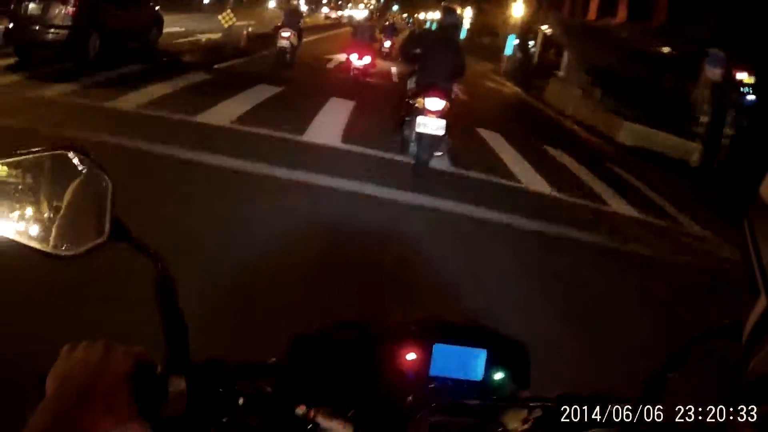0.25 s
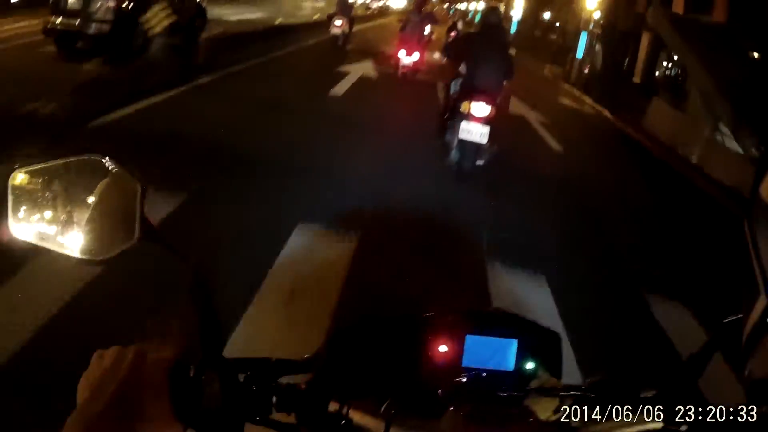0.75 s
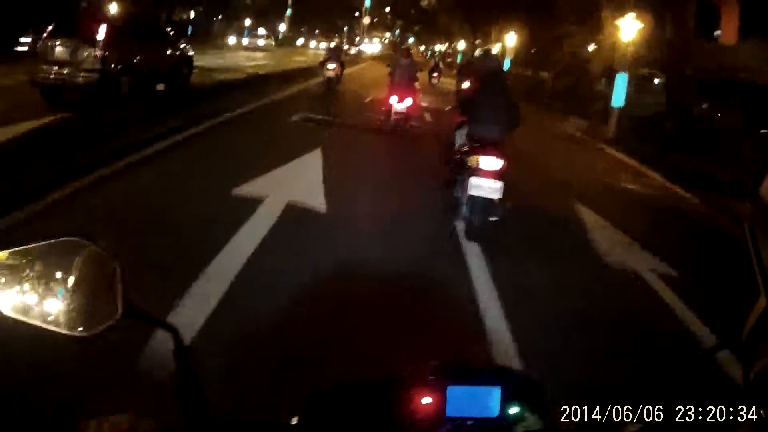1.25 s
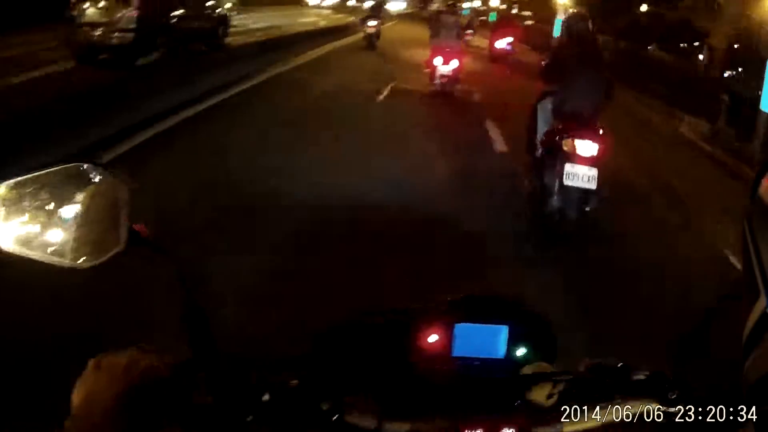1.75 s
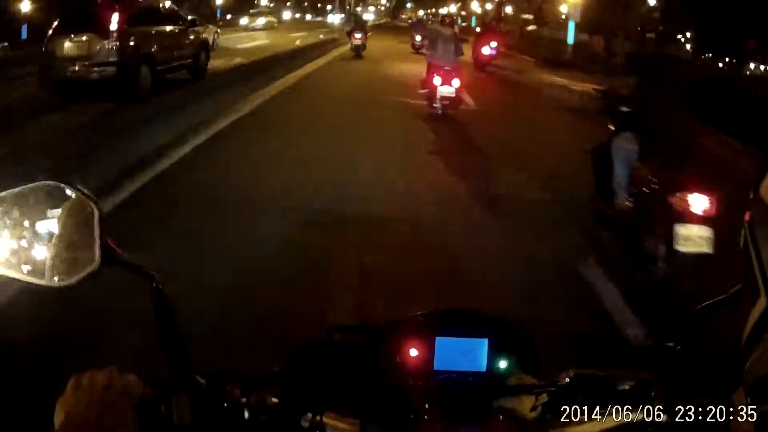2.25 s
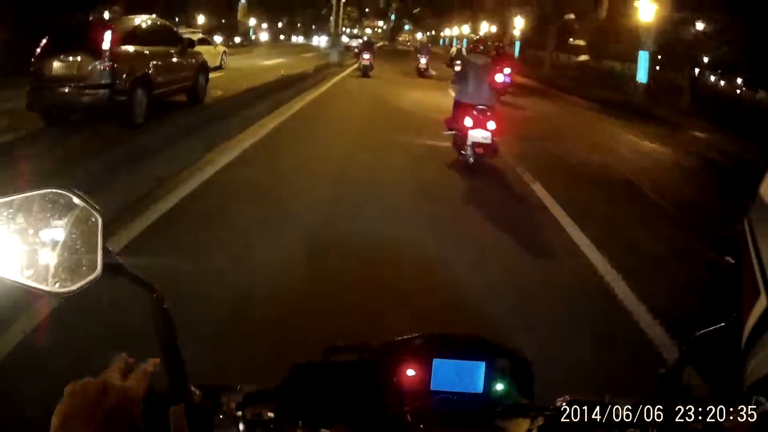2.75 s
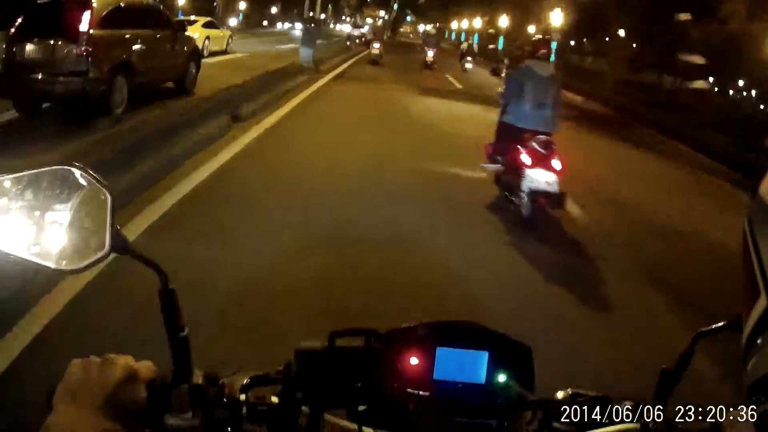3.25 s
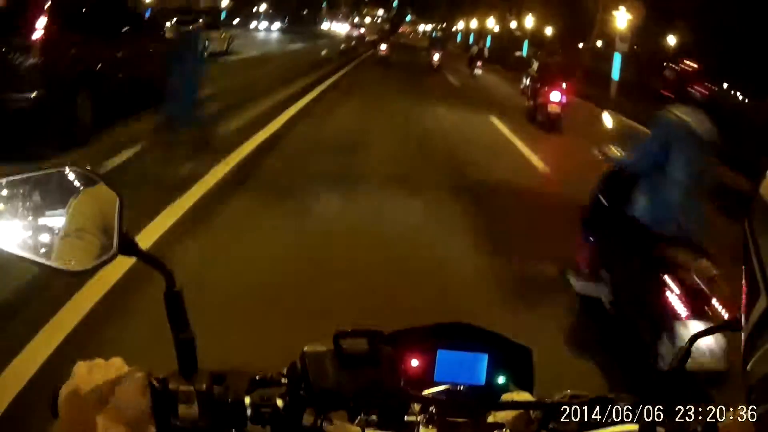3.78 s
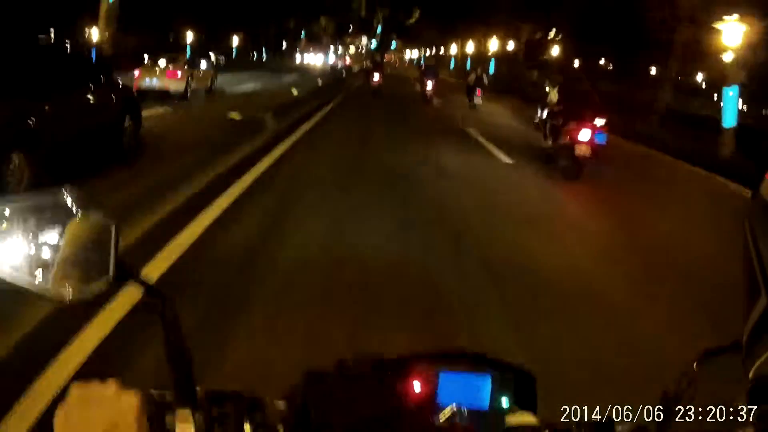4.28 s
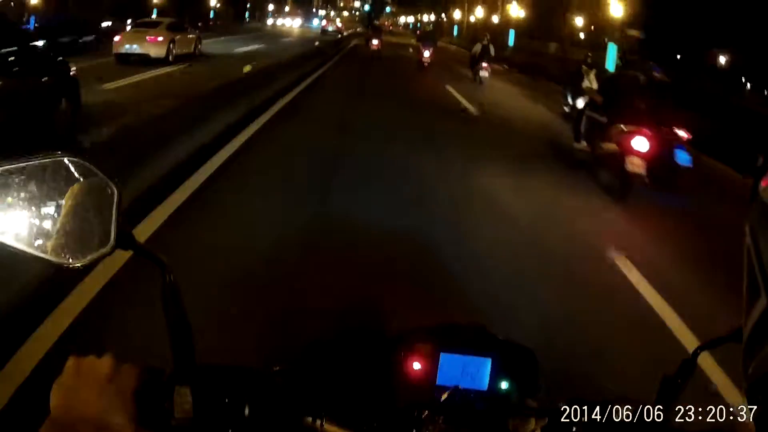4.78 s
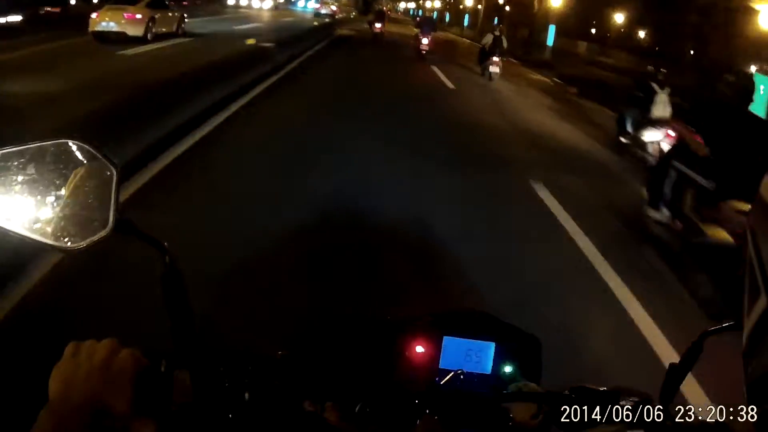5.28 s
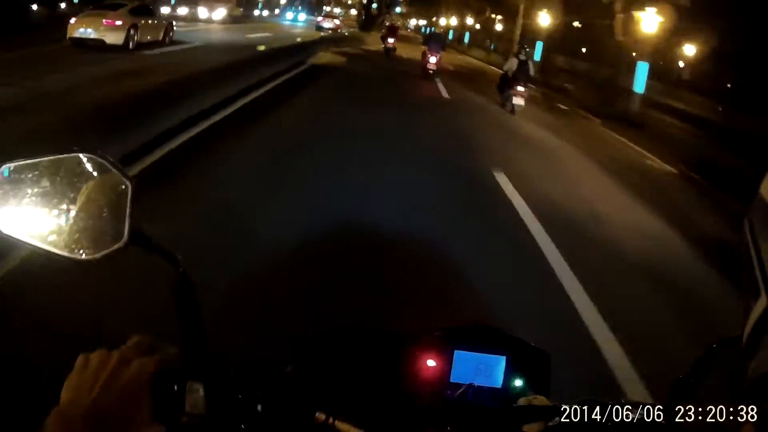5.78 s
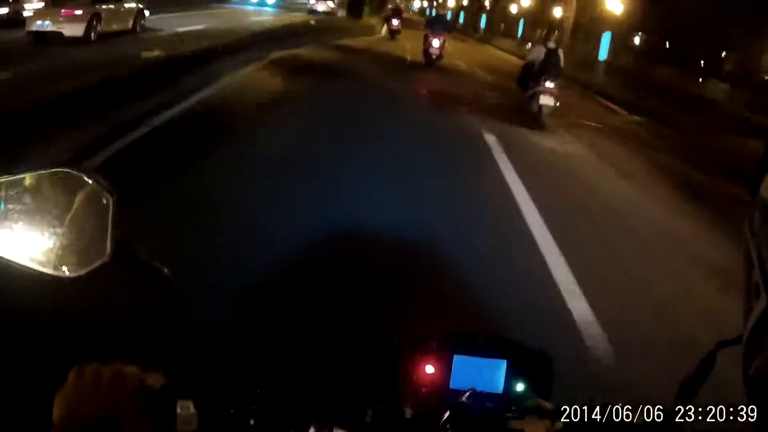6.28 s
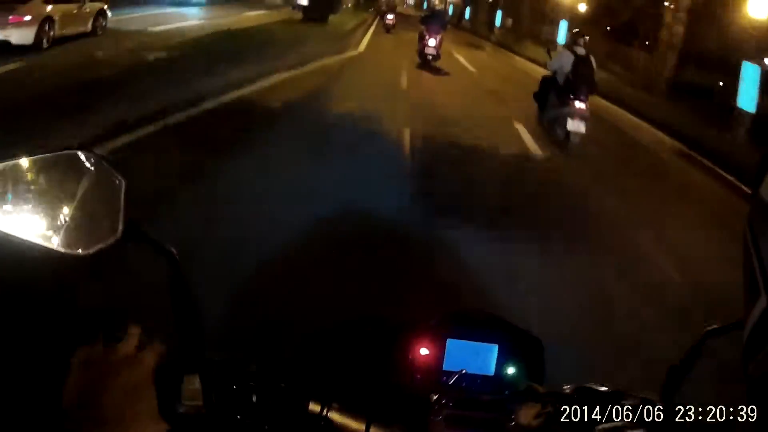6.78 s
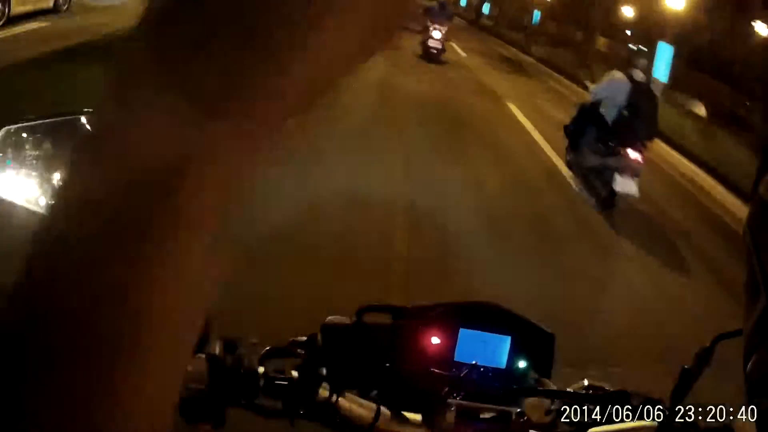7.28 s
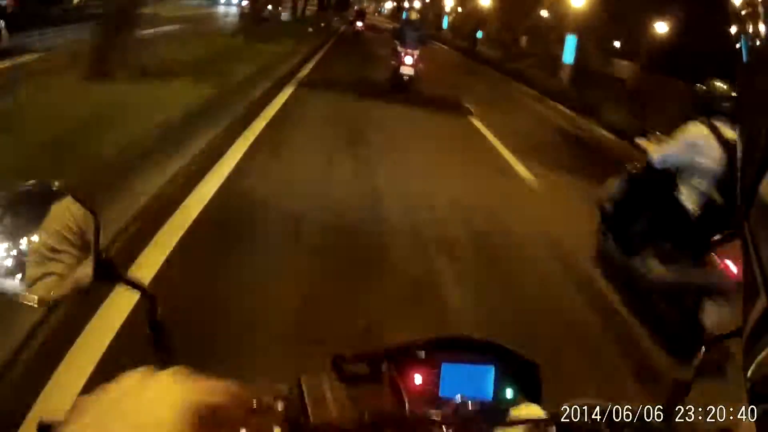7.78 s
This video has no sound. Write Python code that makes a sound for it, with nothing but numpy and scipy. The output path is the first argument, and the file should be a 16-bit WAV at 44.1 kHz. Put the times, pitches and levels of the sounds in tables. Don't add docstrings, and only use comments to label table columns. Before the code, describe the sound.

A microphone on a motorcycle rider catches close single-cylinder exhaust, muffled and throaty, with rapid valve clatter and tyre hiss. Right away the engine eases and its pitch falls for a gear change, ending by 0.35 seconds; from about 0.1 to 0.7 a scooter brake ahead gives a thin, wavering squeal, strongest near 0.2. Bumps knock at 0.5 and 1.25. From 1.4 the engine pulls harder, climbing until a shift at 3.4 drops the note with a jolt. It drives upward again, clatter bright and hard, while gusts batter the microphone into distortion. The heaviest jolt comes at 5.9, beside another gear change; by 6.2 the pitch is lower and the bike coasts, engine softer under roaring wind. Bumps thump near 6.85 and hard at 7.5. Faint, high chain ticking swells around 2.3, 4.3, 5.5 and the end at 8 as scooters are overtaken.

```python
import sys
import numpy as np
from scipy import signal
from scipy.fft import rfft, irfft, next_fast_len
from scipy.io import wavfile
from scipy.ndimage import uniform_filter1d

SR = 44100
rng = np.random.default_rng(int(sys.argv[2]) if len(sys.argv) > 2 else 0)


def to_linear_factor(level_db):
    exponent = np.asarray(level_db, float) / 20
    return 10 ** exponent


def generate_wav(signal):
    frames = np.transpose(np.atleast_2d(signal))
    scaled = np.clip(frames, -1, 1) * 32767
    pcm = np.round(scaled).astype(np.int16)
    wavfile.write(sys.argv[1], SR, pcm)


N = 354563
T = np.arange(N) / SR

# time_s, exhaust_db, crank_hum_db, share of the clatter locked to the cycle [0-1]
THROTTLE = [(0, -18.5, -32.5, 0.85), (.15, -24, -23.5, 0.1), (.25, -25.5, -25, 0.4), (.36, -21.5, -25, 0.3),
            (1.2, -20, -25.5, 0.72), (1.5, -15.5, -16.5, 0.78), (2.1, -15, -21, 0.74),
            (2.5, -14.5, -17, 0.8), (3.35, -14, -21, 0.8), (3.46, -20, -23, 0.3), (3.58, -17, -18, 0.83),
            (4.5, -15, -15.5, 0.82), (5.9, -13.5, -19, 0.76), (6.05, -24, -30.5, 0.27), (7, -22, -18, 0.7),
            (8.04, -25, -30.5, 0.27)]


def evened(x):
    return x / np.sqrt(np.mean(x ** 2) + 1e-20)


def columns(rows):
    s, *values = np.transpose(rows)
    return [np.interp(T, s, v) for v in values]


def locked_share():
    return np.clip(columns(THROTTLE)[2], 0, 1)


def resonate(x, hz, width):
    pole = np.exp((2j * np.pi * hz - np.pi * width) / SR)
    return 2 * signal.lfilter([1 - abs(pole)], [1, -pole], x).real


def ring(x, modes):
    return sum(to_linear_factor(db) * resonate(resonate(x, hz, width), hz, width) for hz, width, db in modes)


def drift(hz):
    span = max(int(SR / hz / 2), 1)
    smooth = uniform_filter1d(rng.standard_normal(N), span)
    return evened(uniform_filter1d(smooth, span))


def coloured(points):
    size = next_fast_len(N)
    hz, db = np.transpose(points)
    log_hz = np.log(np.fft.rfftfreq(size, 1 / SR) + 1)
    shape = np.interp(log_hz, np.log(hz + 1), db, left=-80, right=-120)
    return evened(irfft(rfft(rng.standard_normal(size)) * to_linear_factor(shape), size)[:N])


def exhaust(cycles, hz):
    # centre_hz, width_hz, level_db
    pipe_modes = [(179, 49.4, 1.5), (245.2, 132.6, 5.5), (313.3, 42, -1.5), (399, 30, -8.5), (491, 68, -3)]
    echo_s, echo_gain = 0.003936, 3.03
    pipe_db, hum_db, _ = columns(THROTTLE)
    strength = to_linear_factor(0.68 * rng.standard_normal(600))[cycles.astype(int)]
    pulses = np.diff(np.floor(cycles), prepend=0) * strength / hz
    pulses = pulses + echo_gain * np.roll(pulses, round(echo_s * SR))
    muffler = signal.butter(7, 535., fs=SR, output="sos")
    muffled = signal.sosfilt(muffler, ring(pulses, pipe_modes))
    hum = np.sqrt(2) * np.sin(2 * np.pi * (2 * cycles + .3)) * to_linear_factor(0.26 * drift(1.9))
    return -to_linear_factor(pipe_db) * evened(muffled) + to_linear_factor(hum_db) * hum


def hardness(load_db):
    fade_per_load, hard_load_db = 0.93, -29.5
    return to_linear_factor(np.clip(fade_per_load * (load_db - hard_load_db), -9, 0))


def bump(cycles, at, sharp):
    return np.exp(sharp * (np.cos(2 * np.pi * (cycles - at)) - 1))


def bursts(cycles, hard):
    sizes = to_linear_factor(2.5 * np.clip(rng.standard_normal(1200), -1.6, 1.6))
    uneven = sizes[(2 * cycles + .2).astype(int)]
    strong = hard * bump(cycles, .55, sharp=12.)
    weak = .4 * bump(cycles, .17, sharp=4.)
    return (strong + weak) * uneven


def clatter(knocks, level_db):
    # centre_hz, width_hz, engine_burst_db, tyre_hiss_db
    case_modes = [(1168, 244, 0.5, 2), (1400, 122, -20.5, 7), (1597, 200, 12, 1.5), (1799, 76, -23.5, 2),
                  (2324, 33, -31.5, -18), (3264, 570, -11.5, -13), (3770, 53, -28.5, -15),
                  (5460, 1100, -40.5, -28), (6780, 1300, -30.5, -32), (7790, 850, -40.5, -36.5),
                  (9400, 1300, -49.5, -42)]
    locked = locked_share()
    hz, width, burst_db, hiss_db = np.transpose(case_modes)
    burst = evened(ring(knocks * rng.standard_normal(N), zip(hz, width, burst_db)))
    tyres = rng.standard_normal(N) * to_linear_factor(1.2 * drift(53.0))
    hiss = evened(ring(tyres, zip(hz, width, hiss_db)))
    return to_linear_factor(level_db + 3.5) * (1.07 * locked * burst + np.sqrt(1 - locked ** 2) * hiss)


def valve_slams(cycles, level_db):
    # (centre_hz, width_hz, level_db)
    slams = [
        (.49, 4., [(1640, 430, 0), (3100, 600, -24)]),
        (.93, -5., [(1150, 220, 0), (680, 260, 0), (880, 200, -6)]),
    ]
    out = np.zeros(N)
    for phase, slam_db, modes in slams:
        size = to_linear_factor(0.6 * np.clip(rng.standard_normal(600), -1.6, 1.6))[cycles.astype(int)]
        turns = np.floor(cycles - phase + .004 * drift(40.))
        taps = np.maximum(np.diff(turns, prepend=0), 0) * size
        decay = np.exp(-1 / (.0012 * SR))
        rattle = rng.standard_normal(N) * signal.lfilter([1], [1, -decay], taps)
        rung = ring(rattle + 12.0 * taps, modes)
        soft_faces = [(hz, width, 0) for hz, width, _ in modes]
        out += to_linear_factor(slam_db) * evened(ring(rung, soft_faces))
    return to_linear_factor(level_db) * locked_share() ** 2 * hardness(level_db) * out


def summed(levels_db):
    return 10 * np.log10(sum(to_linear_factor(db) ** 2 for db in levels_db) + 1e-12)


def tick_level(load_db):
    # alongside_s, level_db, near_s
    passes = [
        (2.3, -70.5, 0.24),
        (4.3, -61.5, 0.55),
        (5.5, -60.5, .35),
        (8.1, -64.5, 0.94),
    ]
    full_load_db = -35.5
    own = -66.5 + 1.1 * (load_db - full_load_db)
    return summed([own] + [db - 10 * ((T - s) / near) ** 2 for s, db, near in passes])


def ticks(knocks, load_db):
    # centre_hz, width_hz, level_db
    tick_modes = [(13200, 1000, -8), (14400, 1500, 2), (15300, 900, -5.5)]
    clicks = (rng.random(N) < 900 / SR) * rng.standard_normal(N) * (knocks + .15)
    drive = evened(clicks) + .6 * rng.standard_normal(N)
    return to_linear_factor(tick_level(load_db) + 1.5) * evened(ring(drive, tick_modes))


def squeal():
    # time_s, pitch_hz, level_db
    whistle = [
        (.1, 1930, -67),
        (.18, 1815, -46.5),
        (.45, 1860, -63),
        (.66, 1950, -66),
        (.72, 1820, -70),
    ]
    hz, db = columns(whistle)
    phase = 2 * np.pi * np.cumsum(hz + 11.0 * drift(40.)) / SR
    level = np.sqrt(2) * to_linear_factor(db + 1.2 * drift(30.))
    return level * np.sin(phase) * (T < whistle[-1][0])


def jolts():
    # centre_s, length_s, level_db
    road_bumps = [
        (0.09, 0.034, -19),
        (0.499, .03, -14),
        (1.244, .04, -16),
        (3.407, 0.031, -16),
        (5.884, 0.033, -8.5),
        (6.849, 0.058, -15.5),
        (7.27, 0.051, -18.5),
        (7.483, .05, -9.5),
    ]
    # frequency_hz, density_db per Hz
    shake = [(60, -11.5), (150, -1.5), (300, -3.5), (450, -8.5), (620, -27), (1000, -34), (2000, -54.5)]
    swell = sum(to_linear_factor(db - 10 * ((T - s) / length) ** 2) for s, length, db in road_bumps)
    return swell * coloured(shake)


def gusting():
    # time_s, buffet_db, roar_db
    steady = [(0, -16.5, -16), (1.2, -23, -21.5), (2.2, -18, -17.5), (3.2, -18, -16.5), (5.8, -17, -11),
              (7, -24.5, -12), (8.04, -19.5, -12.5)]
    # start_s, length_s, buffet_db, roar_db
    gusts = [(0.045, 0.011, -4.5, -25), (0.302, 0.02, -11, -24), (0.493, 0.01, -4, -13),
             (1.322, 0.037, -3, -19.5), (2.518, 0.028, -9, -16), (2.795, 0.034, -15.5, -19.5),
             (2.952, 0.11, -8, -20.5), (3.117, 0.023, -6, -18), (3.18, 0.116, -5.5, -15.5),
             (3.409, 0.021, -5.5, -25), (3.459, 0.081, -12, -15.5), (3.695, 0.19, -10.5, -20.5),
             (4.063, 0.15, -9.5, -19.5), (4.239, 0.23, -9, -15), (4.648, 0.2, -8.5, -13),
             (4.928, 0.046, -9, -24.5), (5.043, 0.065, -1, -27), (5.305, 0.622, -6, -19.5),
             (6.02, 0.058, -12, -20), (6.164, 0.064, -9.5, -17.5), (6.406, 0.3, -3, -31),
             (6.744, 0.099, -7.5, -9.5), (6.909, 0.084, -9.5, -12), (7.019, 0.116, -5.5, -27.5),
             (7.275, 0.15, -6.5, -10.5), (7.637, 0.132, -13.5, -8), (7.844, 0.044, -9, -18.5)]
    edge_s = 0.015
    buffet, roar = (to_linear_factor(db) ** 2 for db in columns(steady))
    for start, length, buffet_db, roar_db in gusts:
        first = max(round((start - 2 * edge_s) * SR), 0)
        near = slice(first, round((start + length + 2 * edge_s) * SR))
        inside = np.minimum(T[near] - start, start + length - T[near]) / edge_s
        shape = np.sin(np.pi / 4 * np.clip(1 + inside, 0, 2)) ** 4
        buffet[near] += to_linear_factor(buffet_db) ** 2 * shape
        roar[near] += to_linear_factor(roar_db) ** 2 * shape
    return 10 * np.log10(buffet), 10 * np.log10(roar)


def wind():
    # frequency_hz, density_db per Hz
    buffet_colour = [(8, -12.5), (18, -8.5), (32, -0.5), (50, -13.5), (80, -21), (160, -41)]
    # frequency_hz, density_db per Hz
    roar_colour = [(26, -31), (45, 0.5), (113, -4.5), (222, -7), (336, -9.5), (500, -18), (560, -31),
                   (620, -37), (1000, -47), (1300, -68), (2200, -120)]
    buffet_db, roar_db = gusting()
    swing = coloured(buffet_colour)
    swing = evened(swing / (uniform_filter1d(swing ** 2, 3000) + .05) ** .35)
    buffet = 1.1 * np.tanh(to_linear_factor(buffet_db + 1.5) * swing / 1.1)
    roar_db = np.minimum(roar_db - 3.2, -11)
    return buffet + to_linear_factor(roar_db + 2.29 + 2.12 * drift(27.0)) * coloured(roar_colour)


def scene():
    # time_s, firing_hz
    speed = [(0.0, 41.71), (0.14, 40.53), (0.33, 31.06), (0.65, 33.2), (1.1, 34.38), (1.4, 36.5),
             (3.15, 46.67), (3.38, 47.3), (3.58, 37.35), (4.9, 41.0), (5.95, 44.21), (6.2, 36.69),
             (7.2, 36.3), (8.04, 35.52)]
    # time_s, clatter_db
    load = [(0, -39.5), (.13, -43.5), (.6, -45), (.9, -41.5), (1.27, -40), (1.36, -36), (2.3, -35),
            (3.18, -31.5), (3.47, -40.5), (3.61, -35), (4.2, -34.5), (5.2, -32), (5.4, -33), (5.91, -31.5),
            (6.02, -40.5), (8.04, -39.5)]
    hz, load_db = columns(speed)[0], columns(load)[0]
    cycles = .58 + np.cumsum(hz) / SR
    knocks = bursts(cycles, hardness(load_db))
    engine = exhaust(cycles, hz) + clatter(knocks, load_db)
    engine = engine + valve_slams(cycles, load_db) + ticks(knocks, load_db)
    return (engine + squeal() + jolts() + wind())[None]


def top_cut(x):
    return signal.sosfilt(signal.butter(12, 16300, fs=SR, output="sos"), x)


def record(dry):
    clip = .713
    return top_cut(np.clip(dry, -clip, clip))


dry = scene()
out = record(dry)
generate_wav(out)
```